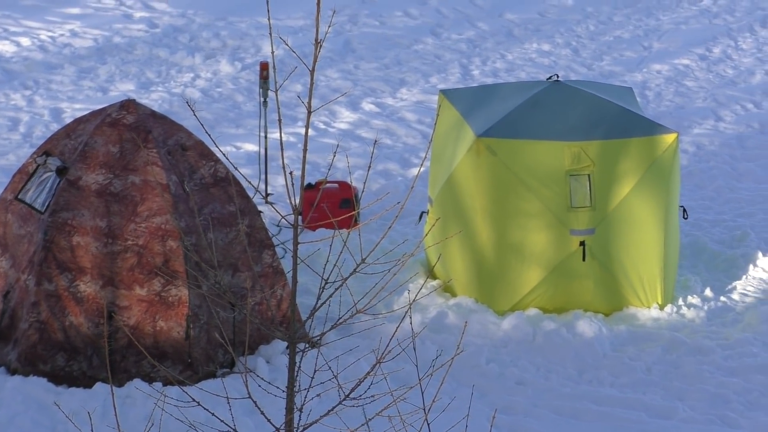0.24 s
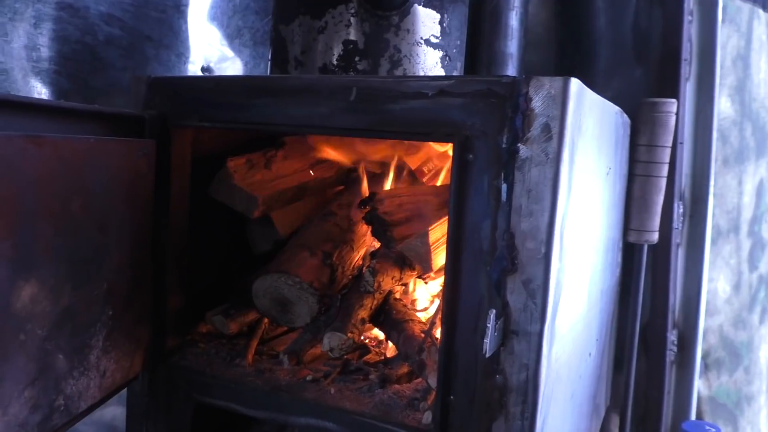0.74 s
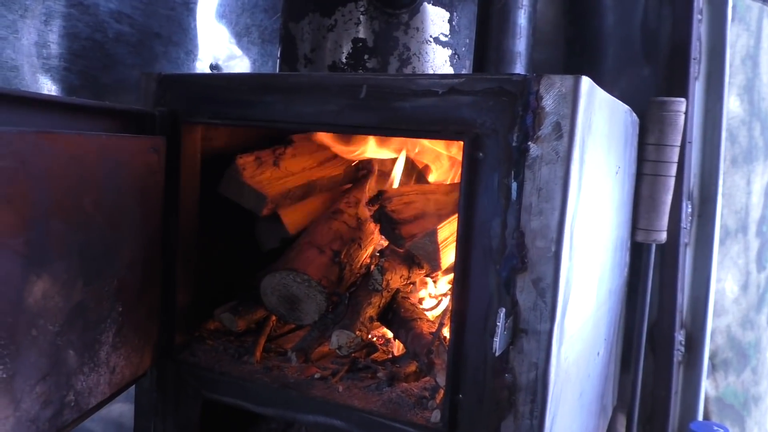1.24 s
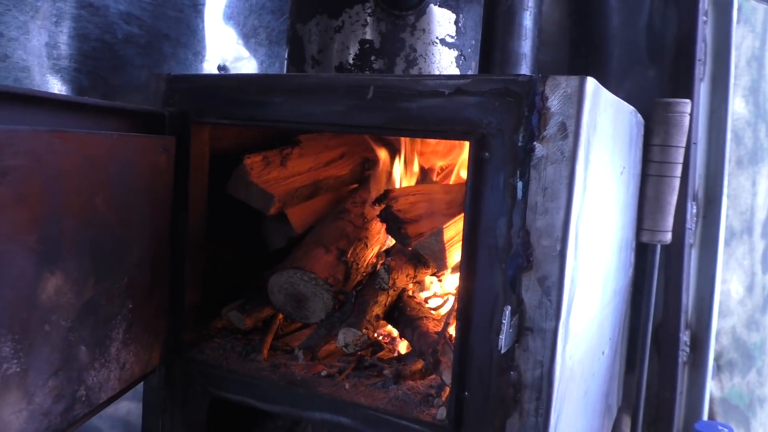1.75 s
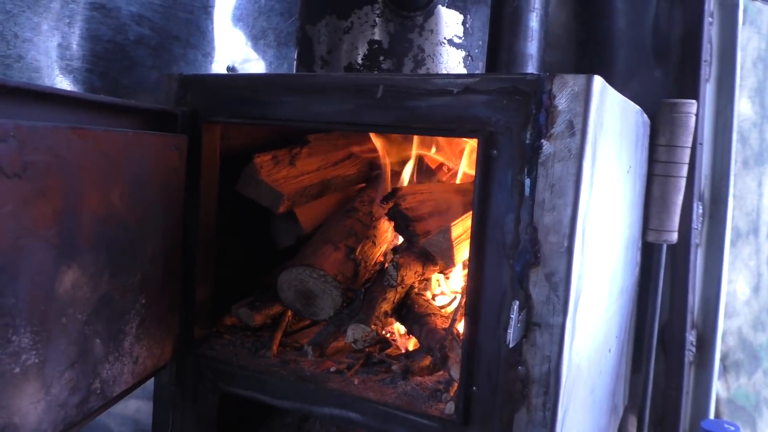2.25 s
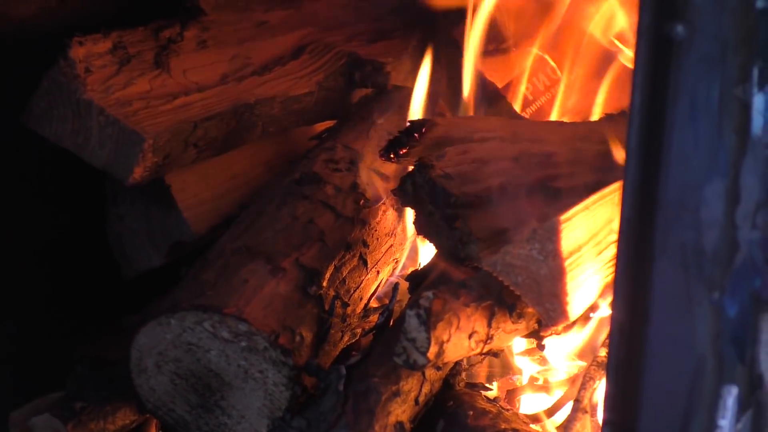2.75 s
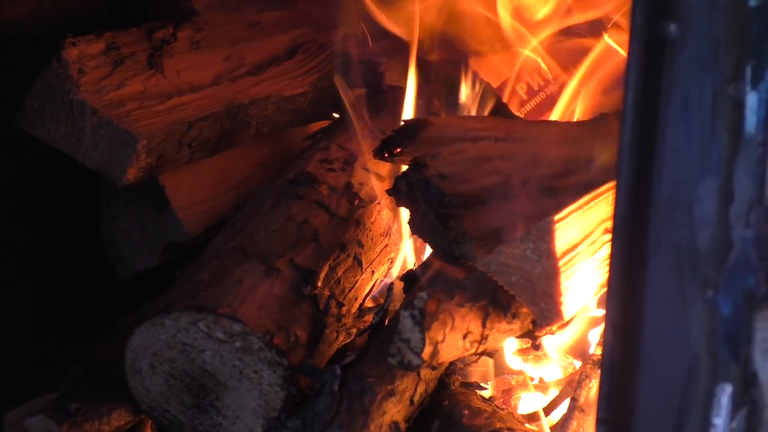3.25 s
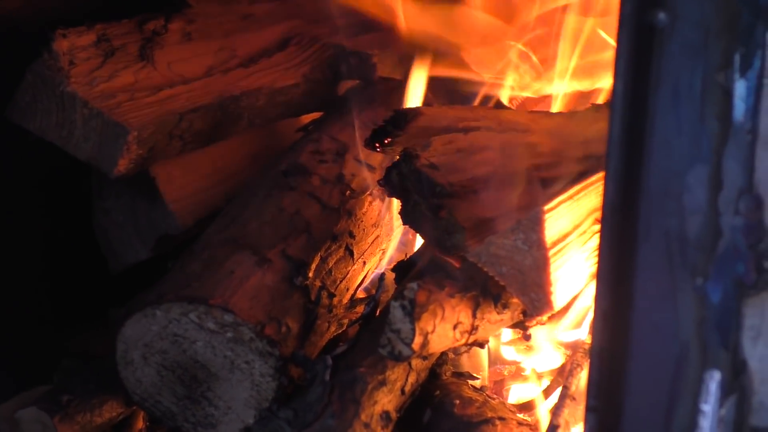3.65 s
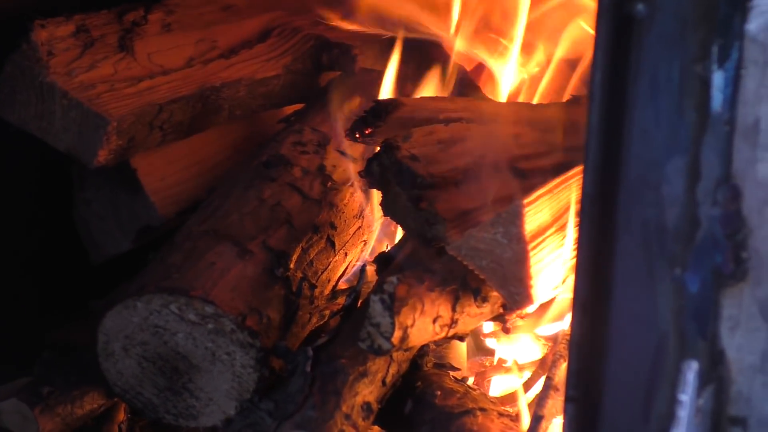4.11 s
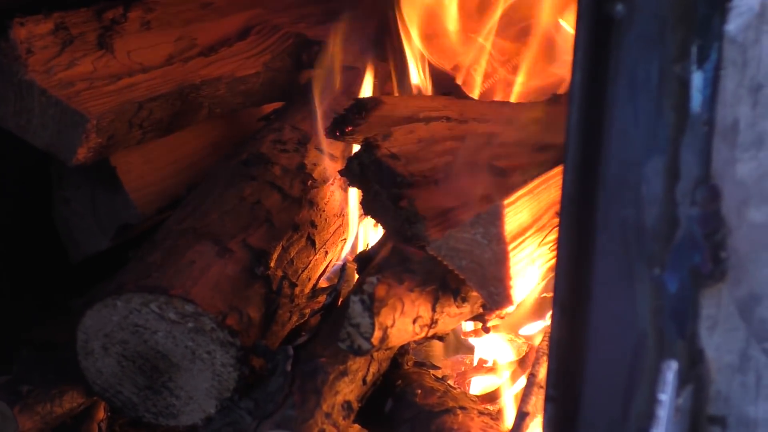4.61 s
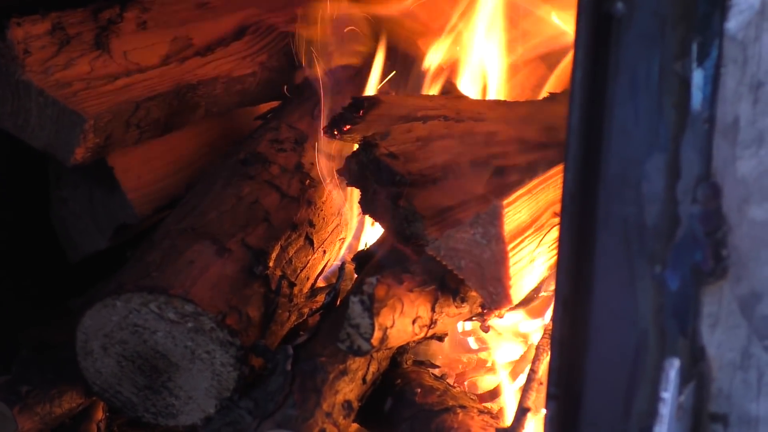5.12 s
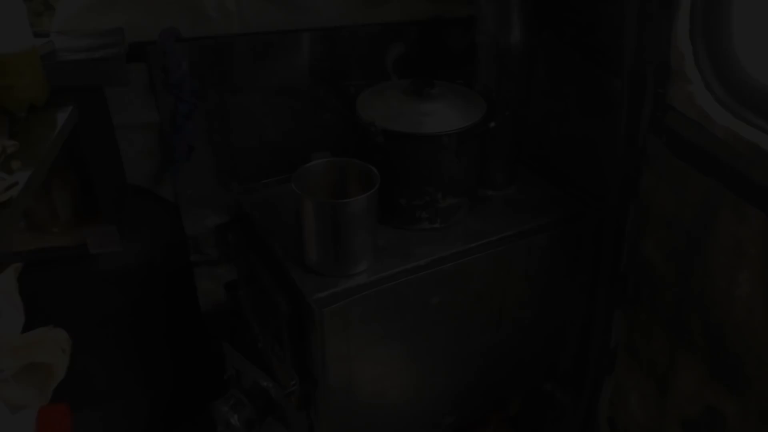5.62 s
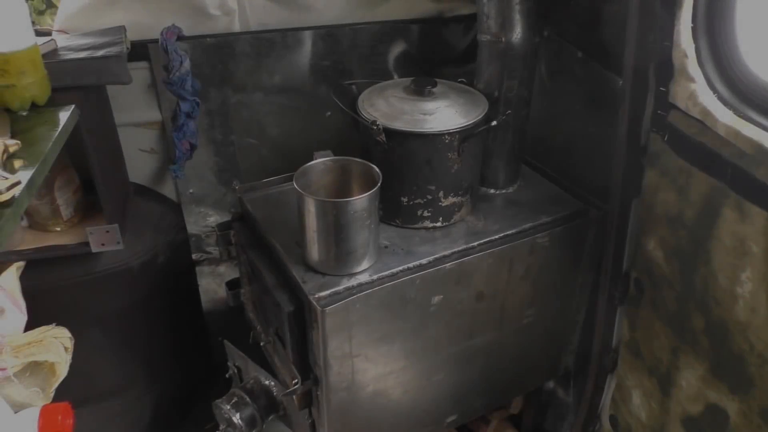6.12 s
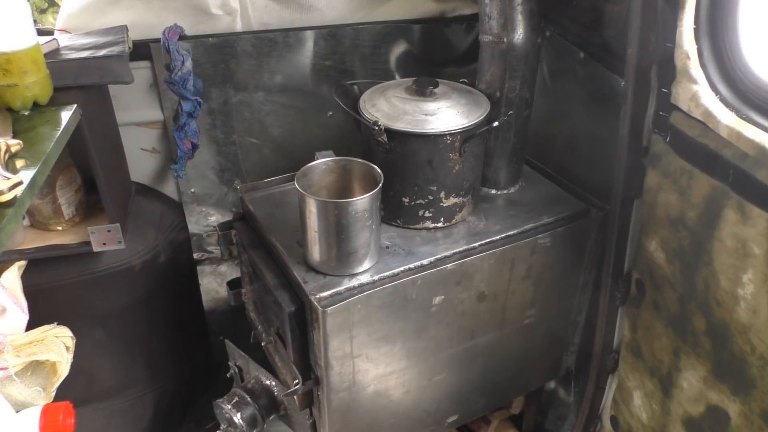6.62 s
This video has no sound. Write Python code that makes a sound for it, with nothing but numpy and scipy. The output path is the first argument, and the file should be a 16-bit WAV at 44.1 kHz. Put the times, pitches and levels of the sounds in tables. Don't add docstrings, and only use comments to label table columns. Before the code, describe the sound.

Soft lumpy wind rumble over open snow cuts to a wood stove fire snapping with sharp ringing pops, then to a quiet simmering hum.

```python
import sys
import numpy as np
from scipy import signal
from scipy.fft import rfft, irfft, next_fast_len
from scipy.io import wavfile
from scipy.ndimage import uniform_filter1d

SR = 44100
rng = np.random.default_rng(int(sys.argv[2]) if len(sys.argv) > 2 else 0)


def dump_mix(stems):
    frames = np.atleast_2d(stems).T
    limited = np.clip(frames, -1, 1)
    pcm = np.round(limited * 32767).astype(np.int16)
    wavfile.write(sys.argv[1], SR, pcm)


def level_to_linear(level):
    exponent = np.asarray(level, float) / 20
    return 10 ** exponent


N = 302694
BED_TOP_HZ = 15950


def rms_one(x):
    return x / np.sqrt(np.mean(x ** 2, axis=-1, keepdims=True) + 1e-20)


def in_time(rows):
    s, *columns = np.transpose(rows)
    return [np.interp(np.arange(N) / SR, s, column) for column in columns]


def at_hz(points, hz):
    point_hz, value = np.array(points)[:, :2].T
    return np.interp(np.log(hz), np.log(point_hz), value)


def between(start, end, edge=0.001):
    t = np.arange(N) / SR
    return np.clip(np.minimum(t - start, end - t) / edge, 0, 1)


def swells(rows, width_s):
    t = np.arange(N) / SR
    return sum(db * np.exp(-((t - s) / width_s) ** 2) for s, db in rows)


def drift(rate_hz):
    r = np.exp(-80 * np.pi * rate_hz / SR)
    slow = signal.lfilter([1], [1, -2 * r, r * r], rng.standard_normal(N // 40 + 2002))[2000:]
    return np.interp(np.arange(N) / 40, np.arange(len(slow)), rms_one(slow))


def band(x, low_hz, high_hz):
    return signal.sosfilt(signal.butter(2, [low_hz, high_hz], "band", fs=SR, output="sos"), x)


def cut_top(x, hz, order=16, loss_db=50):
    return signal.sosfilt(signal.cheby2(order, loss_db, hz, fs=SR, output="sos"), x)


def resonate(x, modes):
    out = 0
    for k, (hz, width, db) in enumerate(modes):
        r = np.exp(-np.pi * max(width, 5) / SR)
        b = (1 - r * r) / 2 * np.array([1, 0, -1])
        a = [1, -2 * r * np.cos(2 * np.pi * hz / SR), r * r]
        out = out + (-1) ** k * level_to_linear(db) * signal.lfilter(b, a, x)
    return out


def stereo(mid, side, alike):
    alike = np.clip(alike, 0, 1)
    return np.sqrt(1 + alike) * mid + np.sqrt(1 - alike) * side * np.array([[1], [-1]])


def coloured(spectrum, likeness):
    size = next_fast_len(N)
    hz = np.maximum(np.fft.rfftfreq(size, 1 / SR), 1)
    shape = level_to_linear(at_hz(spectrum, hz)) * (hz < BED_TOP_HZ)
    mid, side = rfft(rng.standard_normal((2, size))) * shape
    out = irfft(stereo(mid, side, at_hz(likeness, hz)), size)[:, :N]
    return out / np.sqrt(np.mean(out ** 2))


# centre_s, rise_db
WIND = [
    (0, 0),
    (.13, 11.5),
    (.23, 2),
    (.32, 1),
    (.44, 10),
    (.54, 7),
    (.625, 4.5),
]
# pitch_hz, level_db
GUST = [(12, -32), (20, -15), (136, 0), (323, -18.5), (392, -20.5), (577, -43), (669, -39), (700, -42),
        (910, -72), (1540, -120)]
# pitch_hz, level_db
SNOW_AIR = [(290, -44), (500, -3.5), (570, -19), (678, -8), (784, -14), (1280, -7.5), (6330, -27),
            (14200, -20), (16000, -25)]
# pitch_hz, left_right_likeness
SNOW_ALIKE = [(60, 0.98), (240, 0.94), (950, 0.61), (3770, 0.089), (15000, 0.61)]
# start_s, level_db
ICE_TICK = (.6405, -49)


def snowfield():
    lull_db, gust_s, air_db = -49.5, 0.015, -61.5
    lumps = level_to_linear(2.0 * drift(30))
    gusts = level_to_linear(lull_db + swells(WIND, gust_s)) * lumps * coloured(GUST, SNOW_ALIKE)
    tick_s, tick_db = ICE_TICK
    tick = between(tick_s, tick_s + 0.0044) * band(rng.standard_normal(N), 2500, 5500)
    return gusts + level_to_linear(air_db) * coloured(SNOW_AIR, SNOW_ALIKE) + level_to_linear(tick_db) * tick


# centre_s, change_db
SURGES = [(.86, -3), (1.13, 2.5), (1.3, 0), (1.42, -2), (1.6, -3.5), (1.83, -4.5), (1.94, 6), (2.05, 3),
          (2.24, 0.5), (2.31, 8.5), (2.46, 3), (2.58, 5), (2.68, -1.5), (2.78, 4.5), (2.87, -6), (3.0, 0.5),
          (3.12, 3.5), (3.25, 4.5), (3.4, 5), (3.54, 7), (3.63, -2), (3.72, 2.5), (3.8, -4), (3.96, 2),
          (4.1, 4.5), (4.28, 3), (4.38, 3.5), (4.52, 3.5), (4.62, 0), (4.83, -5), (4.92, -5), (5.0, -3),
          (5.09, -5), (5.26, -5), (5.34, -1), (5.42, 5)]
# pitch_hz, level_db
FLUTTER = [(15, -41), (25, -18), (69, -11), (115, -0.5), (150, 2.5), (170, -1), (252, -20.5), (335, -16.5),
           (395, -12.5), (591, -37.5), (697, -25), (848, -43.5), (900, -27), (1170, -50.5), (1980, -120)]
# pitch_hz, left_right_likeness
FIRE_ALIKE = [(30, 0.7), (130, 1), (400, 0.89), (3000, 0.54), (14000, 0.9)]


def flutter(vigour_db, lumps_db):
    surge_s, mean_db, follows = 0.042, -44, 0.61
    level_db = mean_db + follows * vigour_db + swells(SURGES, surge_s) + lumps_db
    return level_to_linear(level_db) * band(coloured(FLUTTER, FIRE_ALIKE), 55, 3000) * level_to_linear([[.5], [-.5]])


def ticks(vigour_db, per_s=320, spread_db=7.5):
    born = rng.random(N) < per_s * level_to_linear(.7 * vigour_db) / SR
    sizes = born * level_to_linear(spread_db * np.minimum(rng.exponential(1, N), 2.1) - 18.5)
    return signal.lfilter([1], [1, -level_to_linear(-60 / (.005 * SR))], sizes + 1e-18)


# pitch_hz, level_db
HISS = [(470, -65), (800, -11), (1270, 1.5), (1540, -3.5), (2210, -2), (2470, -7), (3980, -8.5),
        (4800, -13.5), (7170, -13), (11700, -6.5), (16000, -8)]


def hiss(hiss_db, vigour_db):
    sizzle = level_to_linear(.8 * drift(30))
    rough = .85 + 1.5 * ticks(vigour_db)
    return cut_top(level_to_linear(hiss_db) * sizzle * coloured(HISS, FIRE_ALIKE) * rough, BED_TOP_HZ + 150)


# start_s, peak_db, upper_modes_change_db
THUMPS = [(0.67, -35.5, 0), (0.897, -33, 0), (1.135, -25.5, 0), (1.343, -30, -10), (1.427, -33, 7),
          (1.503, -21.5, -1.5), (1.632, -28, 3), (1.757, -29, 5.5), (1.913, -32, 2), (1.959, -20, 3.5),
          (2.018, -50, 2), (2.062, -32.5, 0), (2.141, -16, -2.5), (2.205, -26.5, 3.5), (2.731, -36, 0),
          (3.007, -25.5, -2), (3.371, -37, -6), (3.81, -31, 3), (3.904, -29, -10), (4.077, -33, 3),
          (4.406, -40, 0), (4.559, -27.5, -3), (4.612, -25.5, -1.5), (4.722, -15.5, 4), (4.835, -32, 5),
          (4.953, -33.5, -1), (5.15, -31, -9), (5.209, -34, 3), (5.39, -54, 0), (5.492, -24.5, -15)]
# pitch_hz, level_db, t60_s
BOX_MODES = [(149.8, -1.5, 0.041), (306, -14.5, 0.052), (440, -12, 0.046), (683, -17, 0.018)]


def thumps():
    s, peak_db, upper_db = np.transpose(THUMPS)
    chance, out = rng.normal(0, 1.7, (len(s), len(BOX_MODES))), np.zeros(N)
    for k, (hz, db, t60) in enumerate(BOX_MODES):
        pushes = np.full(N, 1e-18)
        pushes[np.round(s * SR).astype(int)] = level_to_linear(peak_db + db - 1.5 + (chance[:, k] + upper_db) * (k > 0))
        r, w = level_to_linear(-60 / (t60 * SR)), 2 * np.pi * hz / SR
        mode = [0, np.sin(w)], [1, -2 * r * np.cos(w), r * r]
        ringing = signal.lfilter(*mode, pushes)
        if k == 0:
            ringing = 2 * np.e * (1 - r) * signal.lfilter(*mode, ringing)
        out += ringing
    return band(out, 62, 1800) * level_to_linear([[.55], [-.55]])


# start_s, crack_db, then ring_db, middle_db, edge_db re crack
POPS = [(0.7609, -24, -1, -1.5, -11), (0.985, -16.5, -9.5, -14, -29), (1.007, -19.5, -2.5, -12, -30),
        (1.433, -21.5, -9, -12.5, -23), (2.2099, -17.5, -11.5, -4.5, -21), (2.2684, -22.5, -8.5, -16, -29),
        (2.7782, -10.5, -11.5, -13.5, -16), (3.0025, -23.5, -5, -17.5, -39),
        (3.2778, -17.5, -14.5, -8.5, -1.5), (3.5473, -22, -6, -18.5, -29), (3.5848, -15.5, -17, -12, -14.5),
        (3.8772, -20.5, -13, -2, -28), (3.9082, -23, -3.5, -17, -12), (4.0831, -21.5, -1.5, -19, -36),
        (4.238, -21, -18.5, -18, -33), (4.717, -17, 0.5, -5.5, -7.5), (4.9159, -14.5, -4.5, -12.5, -20.5),
        (4.9615, -19.5, -5, -9.5, -32), (5.1495, -20, -8.5, -6, -8.5), (5.208, -17.5, -13, -9, -18.5),
        (5.491, -20.5, -1, -10, -20.5),
        (1.1289, -19, -5, -2.5, -23),
    (1.505, -22, -10, -6, -7),
    (1.7658, -9.5, -8, -5.5, -24),
    (1.9571, -29, 9, 4, -13),
    (2.9619, -17.5, -9.5, -7.5, -13),
    (3.8057, -16, -14, -8.5, -20),
    (4.3555, -16, -3.5, -10.5, -21),
    (4.6188, -18.5, -10, -6.5, -18.5),
    (4.7663, -19, -9, -10, -5.5),
]
# start_s, crack_db
KNOCKS = [(.7092, -52), (.7805, -37), (.88, -52), (.885, -49), (1.3127, -42.5), (1.4266, -34.5),
          (1.6286, -28.5), (1.7915, -47), (2.4868, -33.5), (2.5851, -66), (2.85, -69), (2.915, -59),
          (3.4312, -40.5), (3.621, -62), (3.636, -58), (3.8159, -31), (3.854, -51), (4.1963, -37.5),
          (4.3904, -55), (4.853, -54), (5.131, -48), (5.4332, -51), (5.5495, -37.5)]
# start_s, crack_db
HOLLOWS = [(1.209, -47.5), (1.4205, -51), (1.4567, -38), (1.5675, -36.5), (1.733, -28.5), (1.8224, -35),
           (1.9205, -33.5), (1.9437, -37), (1.9756, -32.5), (2.123, -46), (2.1405, -25), (2.314, -28),
           (2.354, -43), (2.5944, -35.5), (2.694, -52), (2.9465, -28), (3.09, -44), (3.457, -46.5),
           (3.509, -40.5), (3.965, -30), (4.007, -44), (4.0284, -38.5), (4.0933, -32.5), (4.375, -41.5),
           (4.4747, -46), (4.69, -45), (5.0455, -26.5), (5.0888, -35), (5.1054, -36.5), (5.528, -54)]
# start_s, crack_db
SNAPS = [(.691, -41), (0.7346, -32), (0.863, -32), (.915, -41.5), (0.9498, -25), (0.971, -36.5),
         (1.4873, -39), (1.5963, -25.5), (1.815, -48), (1.908, -42), (2.039, -41.5), (2.0893, -41.5),
         (2.1803, -49), (2.625, -25.5), (2.666, -39), (2.7266, -41), (3.223, -29.5), (3.3731, -31),
         (3.411, -32.5), (3.541, -34), (3.664, -36), (3.9004, -43), (3.9249, -41), (4.1061, -26),
         (4.1308, -35.5), (4.15, -44), (4.23, -42), (4.6077, -34), (4.7738, -26.5), (0.9882, -23),
         (1.0108, -29), (1.439, -34), (3.0908, -40), (4.6214, -30), (4.956, -24), (5.2989, -42)]
# start_s, crack_db
SPITS = [(0.809, -36), (1.0918, -37.5), (1.1878, -44), (1.212, -39), (1.251, -40.5), (1.2905, -47),
         (1.3565, -46), (1.409, -36.5), (1.471, -38), (1.53, -26.5), (1.663, -39.5), (1.8705, -30),
         (1.8873, -27.5), (2.0666, -34), (2.2588, -26), (2.4775, -46), (2.496, -40), (2.522, -40.5),
         (2.855, -43.5), (3.357, -31.5), (3.4, -33), (3.569, -36), (3.9484, -51), (3.982, -34),
         (4.56, -28.5), (4.6343, -30), (4.655, -23), (4.7024, -41), (4.845, -32.5), (5.029, -27),
         (5.0374, -35)]
# start_s, crack_db
PRICKS = [(.7255, -49), (.8282, -51), (.848, -50), (.8942, -49), (.9281, -47), (.9402, -47), (1.194, -49),
          (1.34, -50), (1.396, -45), (1.704, -45), (2.688, -45), (2.7182, -46), (2.9937, -42),
          (3.0526, -48.5), (3.192, -48), (3.26, -52), (3.307, -55), (3.5283, -46), (3.716, -48.5),
          (3.773, -44), (4.0995, -52), (4.1247, -47), (4.442, -48), (5.1652, -51), (1.0863, -47),
          (1.3784, -50), (1.6875, -50), (2.5131, -50), (2.9413, -48), (4.1718, -47), (4.1843, -50),
          (4.4557, -47), (4.5011, -51), (4.6717, -47), (5.179, -47), (5.198, -54), (5.3757, -47.5),
          (5.3826, -49.5), (4.871, -43), (3.519, -43), (4.312, -47.5)]
# start_s, crack_db
TAPS = [(2.36, -62), (2.462, -62), (2.61, -59), (3.036, -64), (3.112, -61), (4.403, -61), (4.433, -64),
        (5.187, -65), (5.415, -65)]
# ring_db, middle_db, edge_db re crack, ring_tilt_db, tail_db re burst
KIND_DB = [
    (6, -10, -10.5, 3.5, -8),
    (-2, -7.5, -15.5, 4, -9),
    (-9.5, -9, -17.5, 3, -8),
    (-18, -12.5, -25, -1, -9.5),
    (-28, -9, -15.5, -2.5, -11.5),
]
TAP_DB = (13, -2, 1, 0, -9)


def bursts():
    tilt_db, tail_db = 5.5, -11.5
    rows = [(*row, tilt_db, tail_db) for row in POPS]
    kinds = KNOCKS, HOLLOWS, SNAPS, SPITS, PRICKS, TAPS
    for kind, colour in zip(kinds, [*KIND_DB, TAP_DB]):
        rows += [(*row, *colour) for row in kind]
    return rows


def voiced(s, voices, blows, width_hz):
    rms_re_peak_db, narrowest_hz = -16.5, 150
    rings, db = blows.copy(), np.full(s.shape, -200.)
    nearest = [np.argmin(np.abs(s - row[0])) for row in voices]
    for k, row in zip(nearest, voices):
        rings[:, k] = resonate(blows[:, k], [(row[2], max(width_hz, narrowest_hz), 0)])
        db[k] = row[1] + rms_re_peak_db
    return rings, db, nearest


# pitch_hz, width_hz, level_db
RING_MODES = [
    (1312, 202, 16),
    (1725, 242, 7),
    (2250, 363, 5),
    (685, 105, -5.5),
    (462, 179, -5),
]
# pitch_hz, width_hz, level_db
CRACK_MODES = [(10000, 5800, -2.5)]
# start_s, peak_db, pitch_hz, box_body_change_db
LOW_VOICES = [(0.7607, -36, 2250, -1.5), (0.9488, -25, 1460, 0.0), (0.9842, -18, 1330, -0.5),
              (1.0071, -12, 1645, -8), (1.1289, -8, 1700, 2), (1.4262, -13, 2190, 0.0),
              (1.504, -18, 2180, -3), (1.5948, -26, 2200, 1), (1.6287, -14, 1600, -3),
              (1.7654, -10, 2110, 0.5), (1.9565, -10, 2180, 3), (2.1396, -11, 1630, -4),
              (2.2089, -17.5, 1220, 7), (2.3137, -20, 2180, 5), (2.4863, -30, 2070, -1),
              (2.7781, -13.5, 1190, 0.0), (2.9457, -12, 1690, -3), (3.0026, -13, 1690, -3),
              (3.2775, -10, 1780, 0.0), (3.4321, -28, 1270, 2), (3.5469, -16, 1650, -17),
              (3.5843, -17.5, 1170, 1), (3.8053, -12.5, 1700, 2), (3.8766, -21, 1270, 4),
              (3.908, -14, 2270, 3.5), (3.9649, -18, 1660, -8), (4.0826, -17, 1270, -0.5),
              (4.1959, -33, 1160, -2), (4.355, -18, 1900, -1), (4.6179, -24, 2080, -11),
              (4.7162, -3, 1450, 5.5), (4.7661, -21.5, 1370, 0.0), (4.9153, -15, 1260, -6.5),
              (4.9606, -17.5, 1240, -4), (5.045, -11.5, 1690, -14), (5.0894, -24, 1260, 4),
              (5.1492, -20, 1250, -6), (5.2086, -20.5, 1200, -0.5), (5.4904, -15, 1240, 1),
              (5.5493, -26, 1270, 3)]
# start_s, peak_db, pitch_hz
HIGH_VOICES = [(0.7602, -17, 2580), (0.9488, -26, 2590), (0.9842, -13.5, 3300), (1.1289, -18, 3760),
               (1.4262, -11.5, 3500), (1.504, -16, 7500), (1.5674, -21, 3450), (1.6282, -20, 2920),
               (1.7654, -17, 3000), (1.9565, -6.5, 5680), (2.1396, -29, 3820), (2.2094, -33, 3820),
               (2.2673, -18.5, 2930), (2.3137, -21, 3600), (2.4863, -22, 3720), (2.625, -24, 2840),
               (2.7781, -6, 6680), (2.9452, -29, 4060), (2.9612, -7.5, 6700), (3.2221, -18, 5260),
               (3.277, -2.5, 6060), (3.5838, -18, 6560), (3.8053, -15, 3020), (3.8766, -17, 3710),
               (3.9075, -16, 3300), (3.9649, -30, 3300), (4.0821, -15.5, 3100), (4.1954, -17, 3090),
               (4.2373, -17, 3680), (4.355, -15.5, 2950), (4.6174, -31, 3390), (4.6179, -23, 7360),
               (4.7162, -11, 2600), (4.7661, -9.5, 4330), (4.9153, -16, 2720), (4.9567, -23, 2930),
               (5.028, -20, 6100), (5.1487, -9.5, 5720), (5.2071, -19, 7800), (5.4909, -18.5, 3070)]
DRY_S = (1.5043, 1.9567, 3.5473, 3.9078, 4.2381)


def pops(burst_s=0.0015):
    dry_loss_db, direct_click, voiced_loss_db, body_re_ring_db = 2.5, 3.4, 3.5, -13
    s, crack_db, ring_db, middle_db, edge_db, tilt_db, tail_db = np.transpose(bursts())[:, :, None]
    at_door = (np.abs(s - np.array(DRY_S)) < .004).any(axis=1, keepdims=True)
    tail_db = tail_db - dry_loss_db * at_door
    t = np.arange(round(.05 * SR)) / SR
    noise = rng.standard_normal((len(s), 3, len(t)), dtype=np.float32)
    chance = rng.standard_normal((len(s), 2))
    lengths = burst_s * level_to_linear(0.18 * (tail_db + 21.0) + 1.2 * chance[:, :1])
    burst = noise[:, 0] * np.clip(t / 0.00027, 0, 1) * level_to_linear(-7.5 * t * 1000) / (1 + (t / lengths) ** 6)
    burst[:, 5] += direct_click * np.sign(noise[:, 0, 5])
    onset = level_to_linear(tail_db - 0.031 * (crack_db + 31.5)) * np.clip(t / 0.0031, 0, 1)

    def blow(t60, apart, order=0):
        tail = onset * level_to_linear(-60 * t / t60)
        scatter = np.diff(noise[:, 2], order, prepend=np.zeros((len(s), order)))
        side = apart * scatter * (tail + 0.045 * np.abs(burst))
        return burst + tail * noise[:, 1] + np.array([side, -side])

    lower = resonate(blow(0.037, 0.49), RING_MODES[:1])
    upper = -resonate(blow(0.035, 0.19), RING_MODES[1:3])
    body = -resonate(blow(0.028, 0.57), RING_MODES[3:])
    low, low_db, low_at = voiced(s, LOW_VOICES, blow(0.023, 0.45), 87)
    high, high_db, high_at = voiced(s, HIGH_VOICES, blow(0.036, 1.0), 440)
    edge = -band(blow(0.064, 1.0), 4940, 7620)
    middle = band(blow(0.047, .8), 2280, 4480)
    crack = band(blow(.040, .4, order=2), 7400, 18500)
    crack = 0.4 * crack + resonate(crack, CRACK_MODES)

    body_db = crack_db + ring_db - tilt_db / 2 + body_re_ring_db
    body_db[low_at, 0] += np.transpose(LOW_VOICES)[3]
    ring_db[low_at] -= voiced_loss_db
    middle_db[high_at] -= voiced_loss_db
    edge_db[high_at] -= voiced_loss_db / 2
    layers = ((lower, crack_db + ring_db - tilt_db / 2 - 2.0, -.7),   # sound, level dB, pan dB
              (upper, crack_db + ring_db + tilt_db / 2 - 3.5, -.7),
              (edge, crack_db + edge_db + 0.053, .5),
              (middle, crack_db + middle_db + 0.13, .1),
              (crack, crack_db + 0.18, 1.1),
              (body, body_db, -.3), (low, low_db, -.7), (high, high_db, .1))
    out, sound = np.zeros((2, N + len(t))), 0
    for layer, db, pan_db in layers:
        head = np.sqrt(np.mean(layer[..., :220] ** 2, axis=(0, 2)))[:, None]
        lean = (pan_db + 0.52 * chance[:, 1:]) / 2
        sound = sound + level_to_linear(db + np.array([lean, -lean])) * layer / head
    closer = CUTS_S[2]
    sound = sound * ((s > closer) | (s + t < closer))
    for k, at in enumerate(np.round(s[:, 0] * SR).astype(int)):
        out[:, at:at + len(t)] += sound[:, k]
    return out[:, :N]


# start_s, end_s, level_db
WHISTLES = [
    (1.03, 1.11, -65),
    (1.36, 1.42, -63),
    (2.34, 2.47, -65),
    (2.8, 2.94, -63.5),
    (4.74, 4.92, -58),
]


def whistle():
    pitch_hz = 1727
    gate = sum(level_to_linear(db) * between(on, off, edge=.015) for on, off, db in WHISTLES)
    tone = [(pitch_hz, 60, 0)]
    breath = rms_one(resonate(resonate(rng.standard_normal(N), tone), tone))
    phase = 2 * np.pi * np.cumsum(pitch_hz + 4 * drift(20)) / SR
    return gate * (1.3 * np.sin(phase) + .28 * breath)


def steam_puff(lumps_db):
    breath = rms_one(resonate(rng.standard_normal(N), RING_MODES[:3]))
    return level_to_linear(-46 + 2 * lumps_db / 3) * between(4.25, 4.325, edge=.015) * breath


# start_s, peak_db
MOANS = [
    (5.01, -51),
    (5.325, -54),
    (5.39, -56),
    (5.432, -50),
]


def moans():
    flue_hz, swell_s = 415, 0.01
    t = np.arange(N) / SR
    swell = sum(level_to_linear(db) * np.exp(-((t - s - swell_s) / swell_s) ** 2) for s, db in MOANS)
    return swell * np.sin(2 * np.pi * flue_hz * t)


# start_s, hiss_db
FIRE = [(.68, -51.5), (1.19, -51.5), (1.44, -48.5), (1.69, -46.5), (2.05, -44.5), (2.32, -48.5),
        (2.335, -56), (2.6, -50.5), (2.87, -54.5), (3.14, -51.5), (3.41, -49.5), (3.68, -54), (3.95, -51.5),
        (4.22, -49.5), (4.6, -49), (4.75, -48.5), (5.29, -55), (5.56, -49.5)]


def fire():
    hiss_db, = in_time(FIRE)
    vigour_db = hiss_db - np.mean(FIRE, axis=0)[1]
    lumps_db = 2.8 * drift(14)
    flame = flutter(vigour_db, lumps_db) + hiss(hiss_db, vigour_db)
    return flame + thumps() + pops() + whistle() + steam_puff(lumps_db) + moans()


# pitch_hz, level_db
TENT = [(15, -54), (25, -24.5), (76, -6.5), (108, -3), (153, 4), (217, -10), (270, -9.5), (427, -14.5),
        (489, -13), (545, -19.5), (1070, -10.5), (1330, -3.5), (4140, -18), (11000, -25.5), (16000, -26)]
# pitch_hz, left_right_likeness
TENT_ALIKE = [(60, 0.92), (380, 0.92), (2380, 0.83), (15000, 0.86)]
# pitch_hz, width_hz
POT_MODES = [(262, 9.3), (286, 8), (334, 9.3), (393, 11), (490, 16), (700, 11), (960, 11), (1190, 12.1),
             (1349, 19), (1668, 43), (2040, 25), (2230, 18), (2830, 140), (3470, 42)]
# pitch_hz, width_hz, level_db
PLATE_MODES = [(4630, 120, 0), (4860, 58, 0), (6100, 110, 0), (6760, 90, 0), (7810, 80, 1), (9460, 260, -2),
               (10500, 200, -6), (11100, 250, -6)]
# length_s, full_level_db
SIMMER = (1.076, -45)
# start_s, level_db
LID_TICKS = [
    (6.096, -51),
    (6.29, -48),
    (6.665, -56),
]


def tent():
    pot_db_per_octave, top_hz = -2.5, 15750
    fade_s, full_db = SIMMER
    wash = coloured(TENT, TENT_ALIKE)
    sung = wash
    for hz, width in POT_MODES:
        sung = sung + 2.0 * resonate(wash, [(hz, width, pot_db_per_octave * np.log2(hz / 1000))])
    for mode in PLATE_MODES:
        sung = sung + resonate(wash, [mode])
    sung = cut_top(sung, top_hz + 50)
    sung = sung + .15 * np.roll(sung, 139, axis=1) + .2 * np.roll(sung, 331, axis=1)
    fade = np.clip((np.arange(N) / SR - CUTS_S[3]) / fade_s + 0.006, 0, 1)
    touches = sum(level_to_linear(db) * between(s, s + 0.0079) for s, db in LID_TICKS)
    touches = touches * band(rng.standard_normal(N), 9000, 15000)
    return level_to_linear(full_db) * fade * sung * level_to_linear([[-.35], [.35]]) + touches


# wind_end_s, fire_start_s, closer_view_s, tent_start_s
CUTS_S = (.662, .673, 2.3243, 5.568)


def scene():
    wind_end, fire_start, closer, fire_end = CUTS_S
    splice = 1 - .93 * between(closer, closer + .012)
    snow = between(-1, wind_end) * snowfield()
    burning = splice * between(fire_start, fire_end) * fire()
    return snow + burning + between(fire_end, 99) * tent()


def gain_control(x, knee_db=-24, ratio=0.087, release_db=40, attack_s=0.019):
    level = 10 * np.log10(uniform_filter1d(np.mean(x ** 2, axis=0), size=128) + 1e-12)
    climb = release_db * np.arange(N) / SR
    held = np.maximum.accumulate(ratio * np.maximum(level - knee_db, 0) + climb) - climb
    r = np.exp(-1 / (attack_s * SR))
    return x * level_to_linear(-signal.lfilter([1 - r], [1, -r], held))


def band_limit(x):
    return signal.sosfilt(signal.butter(12, 16960, fs=SR, output="sos"), x)


def record(dry):
    mix = cut_top(gain_control(dry), 16900, order=10, loss_db=60)
    return band_limit(np.clip(mix, -1, 1))


dry = scene()
out = record(dry)
dump_mix(out)
```